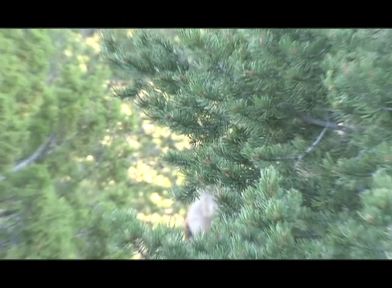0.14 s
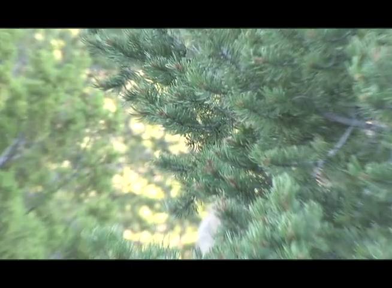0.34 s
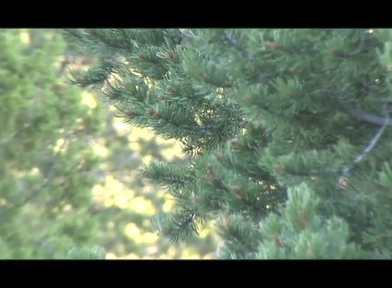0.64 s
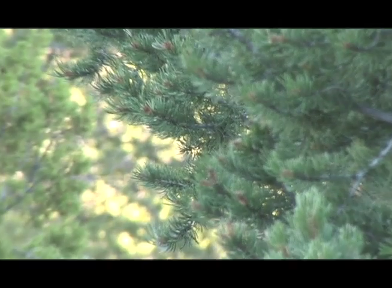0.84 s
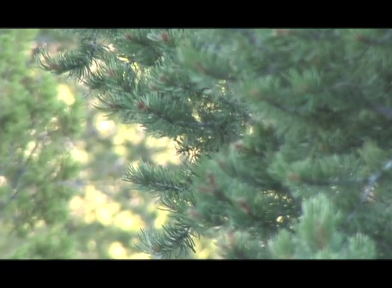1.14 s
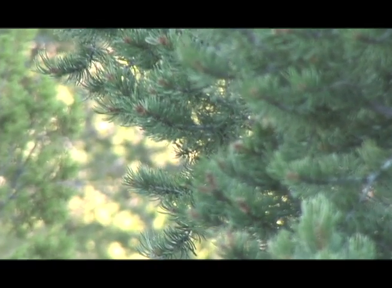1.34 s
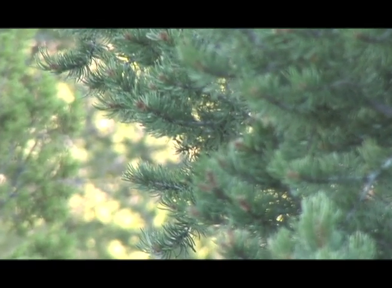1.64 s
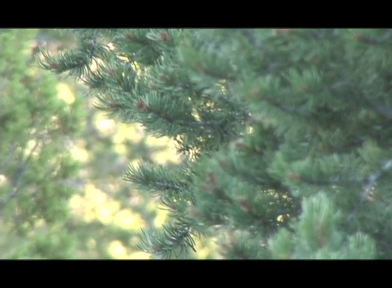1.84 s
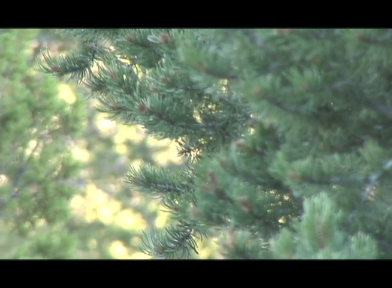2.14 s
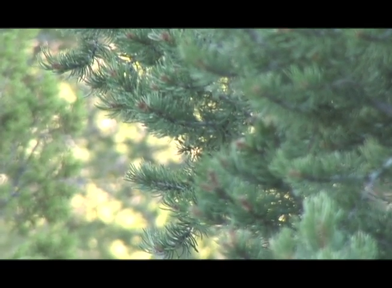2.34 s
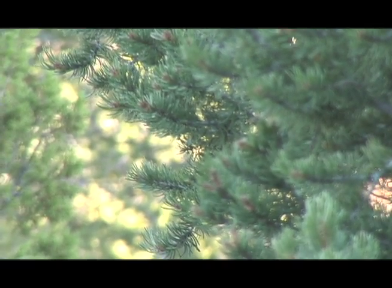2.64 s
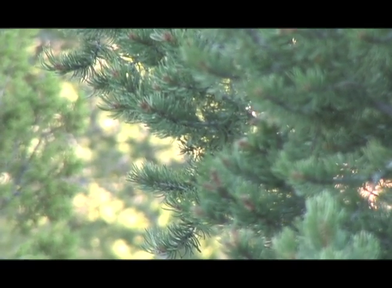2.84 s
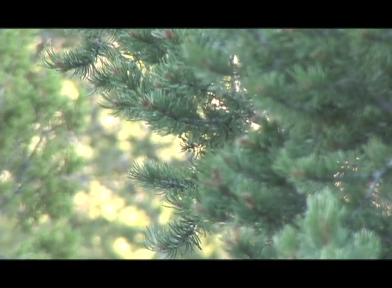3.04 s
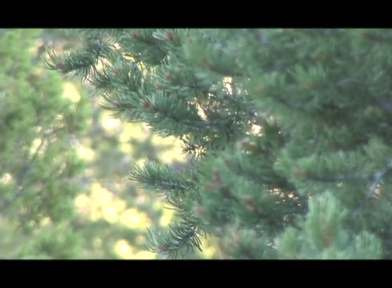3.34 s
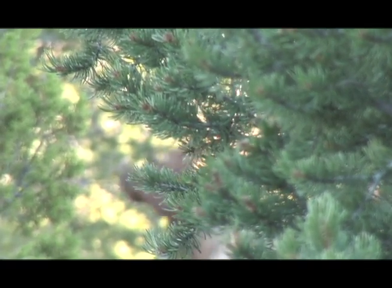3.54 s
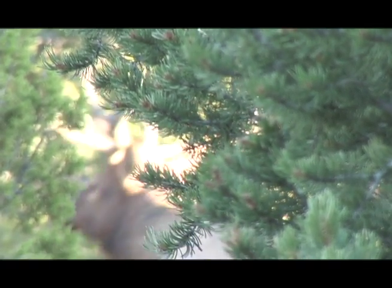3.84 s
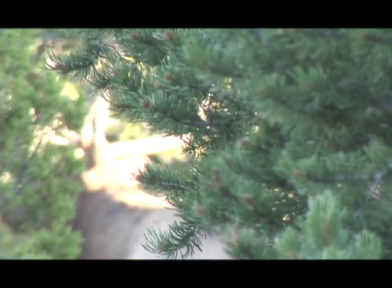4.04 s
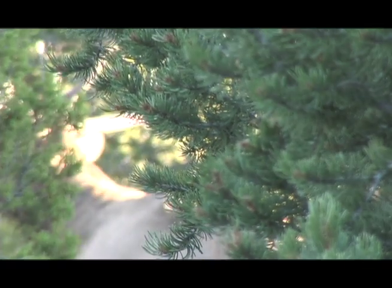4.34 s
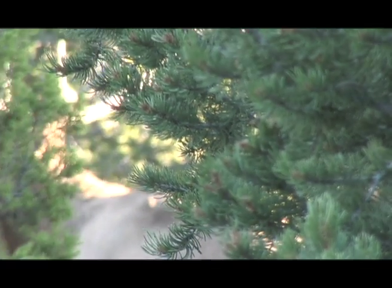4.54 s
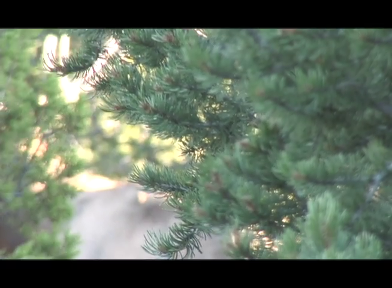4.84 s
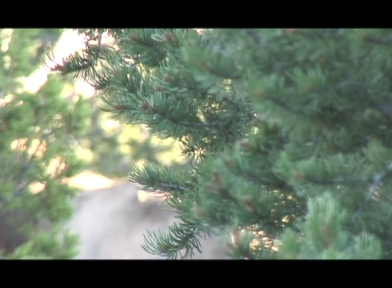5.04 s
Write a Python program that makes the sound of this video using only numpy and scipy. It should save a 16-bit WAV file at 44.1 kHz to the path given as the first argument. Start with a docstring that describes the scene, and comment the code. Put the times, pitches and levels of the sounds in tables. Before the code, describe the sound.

In open pine woods, soft wind and low microphone buffets lie under three loud, reedy elk mews. Each starts high and plunges steeply; the third is longer, wavers, drops, then leaps up for a second fall. Faint echoes return from the trees. A light rustle and crisp twig ticks end it.

```python
"""Among pines, three high elk mews from a reed call, the last one doubled, each falling steeply in pitch.
The reed is a sum of harmonics with hiss, coloured by a short tube; ground, boughs and trunks answer it.
Shaped noise makes far wind in the trees and buffets on the microphone; a wavering sine hums faintly.
Dry ticks are dying bursts and a late rustle is fine crackle.
The camera's gain control ducks all of it when the sound gets loud."""
import sys
import numpy as np
from scipy import signal
from scipy.fft import rfft, irfft, next_fast_len
from scipy.io import wavfile
from scipy.ndimage import uniform_filter1d

SR = 44100
rng = np.random.default_rng(int(sys.argv[2]) if len(sys.argv) > 2 else 0)


def output_pcm(signal):
    """Save a mono or channel-first signal as 16-bit PCM at the path in sys.argv[1].

    Samples are clipped to [-1, 1] before scaling.
    """
    pcm = np.clip(np.atleast_2d(signal).T, -1, 1) * 32767
    wavfile.write(sys.argv[1], SR, np.round(pcm).astype(np.int16))


N = 228517
EDGE_HZ = 15750  # top of the band, for the reed's harmonics and for the final filter


def gain_of(db):
    """Turns decibels into an amplitude factor."""
    return 10 ** (np.asarray(db) / 20)


def evened(x):
    """Scales a signal to an RMS of one."""
    return x / np.sqrt(np.mean(x ** 2) + 1e-20)


def read(points, hz, axis=1):
    """Reads one column of a table on a log-frequency axis."""
    table = np.transpose(points)
    return np.interp(np.log(hz + 1), np.log(table[0] + 1), table[axis])


def curved(t, s, value):
    """Draws a smooth cubic curve through the points."""
    i = np.clip(np.searchsorted(s, t) - 1, 0, len(s) - 2)
    step, slope = np.diff(s)[i], np.gradient(value, s)
    u = (t - s[i]) / step  # progress from one point to the next
    ease = u * u * (3 - 2 * u)
    bend = step * u * (1 - u) * ((1 - u) * slope[i] - u * slope[i + 1])
    return value[i] + ease * np.diff(value)[i] + bend


def swells(events):
    """Sums smooth bell-shaped swells, one per (middle [s], length [s], peak [dB]) row."""
    t = np.arange(N) / SR
    return sum(gain_of(db) * np.exp(-.5 * ((t - s) / (length / 4)) ** 2) for s, length, db in events)


def noise(spectrum, patchy_db, size):
    """Two partly alike channels of random short-time spectra with drifting patches."""
    # how alike left and right are: (frequency [Hz], likeness [0 to 1])
    likeness = [(60, 0.91), (130, 0.33), (290, 0.67), (640, 0.93), (1410, 0.7), (3100, 0.39), (6820, 0.14),
                (15000, 0.068)]
    frames, hz = 4 * N // size + 5, np.fft.rfftfreq(size, 1 / SR)
    a, b, c, d, patches = rng.standard_normal((frames, len(hz), 5)).T
    patches = uniform_filter1d(patches, 12, 0)  # across frequency
    patches = evened(uniform_filter1d(patches, 14, 1))  # across time
    same = np.clip(read(likeness, hz), -1, 1)[:, None]
    left = a + 1j * b
    right = same * left + np.sqrt(1 - same ** 2) * (c + 1j * d)
    level_db = read(spectrum, hz)[:, None] + patchy_db * patches
    frames_lr = np.array([left, right]) * gain_of(level_db)
    return evened(signal.istft(frames_lr, nperseg=size, noverlap=3 * size // 4)[1][:, :N])


def tree_wind():
    """Far wind in the trees: a steady wide noise, darker towards the treble."""
    # spectrum of the wind in the trees: (frequency [Hz], relative level [dB])
    tree_spectrum = [(88, -8.5), (150, -2), (296, -8.5), (445, -2.5), (844, -5), (1270, -9), (1800, -15),
                     (3480, -22.5), (4070, -23), (7720, -24.5), (15500, -28)]
    wind_db = -58  # RMS level
    return gain_of(wind_db) * noise(tree_spectrum, patchy_db=.5, size=1024)


def buffets():
    """Wind pushing on the microphone: bass noise that swells out of a calm level."""
    # spectrum of the buffeting: (frequency [Hz], relative level [dB])
    buffet_spectrum = [(15, -44), (30, -22), (42, -18), (55, 12.5), (75, 6), (110, 4.5), (135, -11),
                       (220, -21.5), (320, -31), (500, -101.5)]
    # gusts added to the calm level: (middle [s], length [s], peak [dB])
    gusts = [(0, 0.048, -39), (.29, 0.27, -50.5), (1.4, 0.24, -43.5), (1.55, 0.25, -62), (2.7, 0.077, -47),
             (3.01, 0.079, -40), (3.27, 0.2, -49)]
    calm_db = -62.5
    return (gain_of(calm_db) + swells(gusts)) * noise(buffet_spectrum, patchy_db=2.5, size=8192)


def hum():
    """A faint steady sine that wavers in level."""
    hum_hz, hum_db, waver_db = 154, -76, 5.1
    waver = evened(uniform_filter1d(rng.standard_normal(N), size=5000))
    tone = np.sqrt(2) * np.sin(2 * np.pi * hum_hz * np.arange(N) / SR)
    return gain_of(hum_db + waver_db * waver) * tone


def ticks():
    """Dry ticks of twigs or cloth: a few dying cycles at a centre pitch, roughened by noise."""
    # the clearest ticks: (time [s], level [dB], centre [Hz], left louder by [dB])
    clear_ticks = [(0.6186, -46, 7770, 1.0), (0.8949, -58, 4890, 1.5), (2.0068, -48, 5090, 4.0),
                   (2.1221, -55, 7510, -6.0), (4.2608, -52, 8390, 7.5), (4.4743, -40, 6480, 7.5),
                   (4.5586, -53, 6870, 3.0), (4.6808, -50, 6780, 5.0), (4.7721, -52, 5070, 4.0),
                   (4.806, -47, 8180, 4.5), (4.8459, -43, 6640, 6.0), (4.9851, -49, 7650, 2.5),
                   (5.0184, -52, 5130, 3.0)]
    # ranges for the fainter ticks, a (low, high) pair for each of:
    # (time [s], level [dB], centre [Hz], left louder by [dB])
    faint_ranges = (4.48, 5.1), (-60, -54), (5500, 8400), (1.5, 5)
    low, high = np.transpose(faint_ranges)
    rows = np.vstack([clear_ticks, low + (high - low) * rng.random(size=(7, 4))])
    out, t = np.zeros((2, N)), np.arange(200) / SR
    for (s, db, hz, pan_db), grit in zip(rows, rng.standard_normal((len(rows), 200))):
        body = np.cos(2 * np.pi * hz * t) + .7 * uniform_filter1d(grit, size=2)
        tick = body * gain_of(db - 60 * t / .002)  # falls 60 dB in 2 ms
        at = round(s * SR)
        out[:, at:at + 200] += gain_of([[pan_db / 2], [-pan_db / 2]]) * tick
    return out


def reed(dull_db, curve):
    """Sharp regular snaps as a sum of harmonics; air hisses at each opening, more as the reed goes slack."""
    # extra strength of the fundamental: (reed pitch [Hz], level [dB])
    fundamental_lift = [(250, 4.5), (330, 6), (430, -1.5), (520, -1), (900, 1.5), (1300, 3.5), (1600, 0.5),
                        (1780, 3.5)]
    attack_s, release_s, shut_db = .013, .03, -36  # the blow rises from and sinks back by this much
    bright_db, brighten_s = 2, .11  # the dull start clears towards this slope per octave
    weak_db, weak_dull = -28, 1  # under this blow: overtones fade, dB per octave for each dB
    weak_first = .54  # and the fundamental stands out, dB for each dB
    waver_taut, waver_slack = .00091, .006  # share of the pitch, and its growth per octave of slack
    air_db, air_slack_db, air_glide_db = -50, 10, 2.1  # hiss, rise per octave of slack, per octave/s of glide
    leak_db, leak_s = -64.5, .06  # air leaking past the reed around its start

    s, pitch, blow_db = np.transpose(curve)
    on = slice(round(s[0] * SR), round(s[-1] * SR))
    t = np.arange(N)[on] / SR
    shut = np.clip(1 - (t - s[0]) / attack_s, 0, 1) + np.clip(1 - (s[-1] - t) / release_s, 0, 1)
    blow_db = np.interp(t, s, blow_db) + shut_db * shut
    slope_db = bright_db + (dull_db - bright_db) * np.exp(-(t - s[0]) / brighten_s)
    slope_db = slope_db - weak_dull * np.maximum(weak_db - blow_db, 0)

    hz = curved(t, s, pitch)
    slack = np.clip(np.log2(1700 / hz), 0, 2)  # octaves under the taut pitch
    glide = np.minimum(abs(np.gradient(np.log2(hz), t)), 9)  # octaves a second
    waver = evened(uniform_filter1d(rng.standard_normal(len(hz)), 150))
    turns = np.cumsum(hz * (1 + (waver_taut + waver_slack * slack) * waver)) / SR

    k = np.arange(1, 70)[:, None]  # harmonic numbers
    harmonic_gain = gain_of(slope_db * np.log2(np.maximum(k / 2, 1)))  # slopes above the second harmonic
    snaps = (np.cos(2 * np.pi * k * turns) * harmonic_gain * (k * hz < EDGE_HZ)).sum(0)
    lift_db = read(fundamental_lift, hz) + weak_first * np.clip(weak_db - blow_db, 0, 25)
    snaps += (gain_of(lift_db) - 1) * np.cos(2 * np.pi * turns)
    snaps *= np.sqrt(2 * hz / EDGE_HZ)  # fewer harmonics fit at a high pitch, so each is stronger

    hiss = gain_of(air_db + air_slack_db * slack + air_glide_db * glide) * rng.standard_normal(len(hz))
    air = hiss * (1 + np.cos(2 * np.pi * turns))  # pulses once per snap
    out = swells([(s[0], leak_s, leak_db)]) * rng.standard_normal(N)
    blow = gain_of(uniform_filter1d(blow_db, size=90))
    out[on] += blow * (snaps + air) * signal.windows.tukey(len(hz), 300 / len(hz))
    return out


def tube(x):
    """Resonances of the short tube as a causal filter: the phase follows from the log gain."""
    # colour of tube and microphone together: (frequency [Hz], level [dB])
    tube_colour = [(200, 1.5), (590, 7.5), (680, -9.5), (780, 8), (1300, 17), (2000, 22.5), (3100, 25),
                   (4300, 13.5), (5100, -3.5), (6000, 6.5), (6700, -4.5), (7400, 12), (8100, 9.5),
                   (8900, 1), (10200, -8), (11300, -12.5), (12800, -23), (15500, -35)]
    hz = abs(np.fft.fftfreq(4096, 1 / SR))
    log_gain = read(tube_colour, hz) * np.log(10) / 20
    ring = np.fft.ifft(np.exp(signal.hilbert(log_gain).conj())).real[:2048]
    return signal.oaconvolve(x, ring)[:N]


def mews():
    """Three mews blown through the reed and its tube."""
    # each mew: (slope at the start [dB per octave above the second harmonic], curve),
    # with a curve of (time [s], reed pitch [Hz], blow [dB])
    calls = [ (-18.5, [(.986, 1638, -18), (1.002, 1667, -29.5), (1.05, 1639, -21.5), (1.1, 1644, -17.5),
             (1.125, 1576, -18), (1.165, 1335, -18), (1.245, 843, -23), (1.325, 450.6, -28.5),
             (1.38, 287.2, -30.5), (1.405, 260.5, -32.5), (1.435, 220, -38)]), (-11.5, [(2.138, 1433, -27),
             (2.18, 1550, -24.5), (2.24, 1597, -24), (2.265, 1563, -23.5), (2.3, 1289, -23),
             (2.36, 793.3, -25), (2.42, 472.5, -29.5), (2.452, 307.3, -32.5), (2.485, 249, -39.5)]),
             (-13, [(3.033, 1556, -32.5), (3.075, 1719, -21.5), (3.125, 1748, -16.5), (3.175, 1730, -12),
             (3.215, 1636, -18), (3.26, 1504, -12.5), (3.315, 1585, -20), (3.355, 1713, -20),
             (3.41, 1775, -18), (3.475, 1767, -19), (3.51, 1752, -16), (3.555, 1544, -17.5),
             (3.635, 841, -23), (3.68, 546.6, -27.5), (3.73, 479, -31.5), (3.755, 529, -39.5),
             (3.778, 752, -60), (3.796, 1018, -40.5), (3.815, 1358, -31), (3.835, 1627, -26),
             (3.865, 1757, -13.5), (3.895, 1664, -14), (3.925, 1518, -17), (3.952, 1410, -17),
             (3.975, 1123, -19), (4, 746.3, -23), (4.03, 505.3, -26.5), (4.06, 330.7, -35),
             (4.095, 245, -42)]), ]
    return tube(sum(reed(*call) for call in calls))


def ports(x):
    """Level and phase differ between two microphone ports; near surfaces add a few quick copies."""
    # how the mew falls on the ports: (frequency [Hz], left louder by [dB], left leads by [radians])
    port_balance = [(400, 3, 1.4), (700, 6, -.3), (1100, 11, -1.6), (1600, 6, -2.6), (2200, 0, -2.7),
                    (2600, 0, -2.4), (2950, 4, -2.5), (3250, 5, -2.9), (3500, 1, -3.8), (3900, -3, -3.7),
                    (4350, -1, -3.7), (4800, 1, -6.3), (5900, 2, -9.4), (7100, 4, -12), (8300, 4, -12.7),
                    (9200, 11, -13.1), (9900, 3, -14), (12500, 1, -12.8)]
    # reflections off hands, camera body and ground: (delay [s], left [dB], right [dB])
    near_copies = [(.0012, -14.5, -14), (.0018, -18.5, -12.5), (.0028, -36.5, -35.5), (.0062, -32, -15.5),
                   (.0074, -20, -10)]
    size = next_fast_len(N + 4096)
    hz = np.fft.rfftfreq(size, 1 / SR)
    # half of each difference goes to the left, its inverse to the right
    half = gain_of(read(port_balance, hz) / 2) * np.exp(.5j * read(port_balance, hz, axis=2))
    copies = 1 + sum(gain_of(db)[:, None] * np.exp(-2j * np.pi * hz * s) for s, *db in near_copies)
    return irfft(rfft(x, size) * np.array([half, 1 / half]) * copies, size)[:, :N]


def branches(x):
    """Short dense scatter from the nearest boughs, different at each port, breaks up the gliding overtones."""
    scatter_db, t60_s, highpass_hz = -5.5, .04, 2500
    t = np.arange(4000) / SR
    burst = rng.standard_normal((2, 4000)) * gain_of(-60 * t / t60_s) * (t > .002)
    burst = burst / np.linalg.norm(burst[0])
    burst = signal.lfilter(*signal.butter(1, highpass_hz, "high", fs=SR), burst)
    return gain_of(scatter_db) * signal.oaconvolve(x[None], burst, axes=1)[:, :N]


def trunks(x):
    """Sparse echoes of random sign from the trees, each band dying at its own speed."""
    # decay of the echo: (frequency [Hz], time to fall 60 dB [s])
    decay_times = [(500, .6), (1500, .7), (2600, .8), (3500, .72), (5000, .5), (9000, .3)]
    # colour of the echo: (frequency [Hz], relative level [dB])
    echo_colour = [(500, -4), (1600, -0.5), (2300, 2.5), (3100, -0.5), (4200, 7.5), (5500, 4), (9000, -1)]
    echo_db = -34
    taps = np.zeros((2, SR))
    # one echo at a random place in every 20 samples
    at = np.arange(500, SR - 20, 20) + rng.integers(0, 20, (2, (SR - 501) // 20))
    np.put_along_axis(taps, at, rng.choice([-1., 1.], at.shape), 1)
    hz, t, z = signal.stft(taps, SR, nperseg=256)
    fade_db = read(echo_colour, hz)[:, None] - 60 * t / read(decay_times, hz)[:, None]
    tail = signal.istft(z * gain_of(fade_db), SR, nperseg=256)[1]
    tail = tail / np.linalg.norm(tail[0])
    return gain_of(echo_db) * signal.fftconvolve(x[None], tail, axes=1)[:, :N]


def rustle():
    """Dense fine crackle in the treble, a little to the left: random grains of uneven strength."""
    # stirs of rustling: (middle [s], length [s], peak [dB])
    stirs = [(4.26, 0.072, -60.5), (4.36, 0.21, -63), (4.8, 0.45, -71.5), (5.05, 0.17, -74)]
    grains = rng.standard_normal(N)
    grains *= gain_of(2.5 * rng.exponential(1, N))
    grains *= rng.random(N) < 8000 / SR  # keeps about 8000 grains a second
    band = signal.butter(2, [4500, 11000], "band", fs=SR, output="sos")
    crackle = evened(signal.sosfilt(band, grains))
    return swells(stirs) * crackle * gain_of([[2.5], [-2.5]])


def scene():
    """Mixes the mews and their echoes with the wind, hum, ticks and rustle."""
    call = mews()
    wind = tree_wind() + buffets()
    answered = ports(call) + branches(call) + trunks(call)
    return answered + wind + hum() + ticks() + rustle()


def record(dry):
    """Gain control: dips quickly at a loud attack, deeper while it stays loud, slow to return; then band limit."""
    threshold_db, strength = -26, .68  # dB of cut for each dB over the threshold
    fall, back_db = .06, .025  # per step: share of the missing cut taken, most dB given back
    step = 44  # samples, about a millisecond
    power = abs(uniform_filter1d((dry ** 2).mean(0), 220))[::step]
    power_db = 10 * np.log10(power + 1e-12)
    wanted_db = strength * np.maximum(power_db - threshold_db, 0)
    duck_db = np.zeros(len(wanted_db))
    for i in range(1, len(duck_db)):
        gap_db = wanted_db[i] - duck_db[i - 1]
        duck_db[i] = duck_db[i - 1] + (fall * gap_db if gap_db > 0 else max(gap_db, -back_db))
    ducked = dry / gain_of(np.interp(np.arange(N), np.arange(len(duck_db)) * step, duck_db))
    lowpass = signal.firwin(511, EDGE_HZ, window=("kaiser", 9), fs=SR)
    return signal.oaconvolve(ducked, lowpass[None], "same")


dry = scene()
out = record(dry)
output_pcm(out)
```